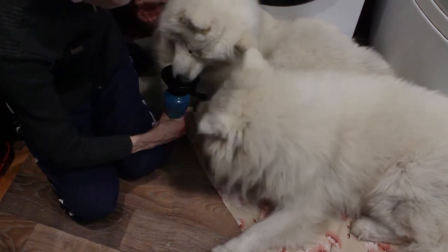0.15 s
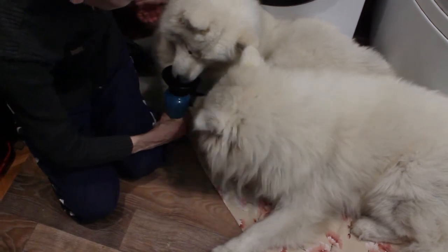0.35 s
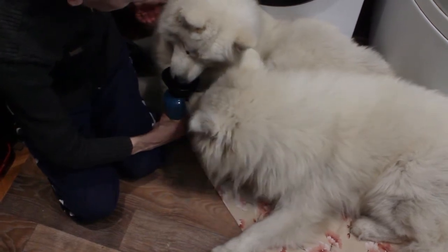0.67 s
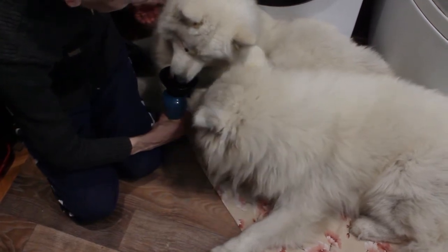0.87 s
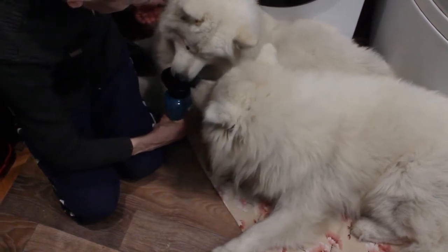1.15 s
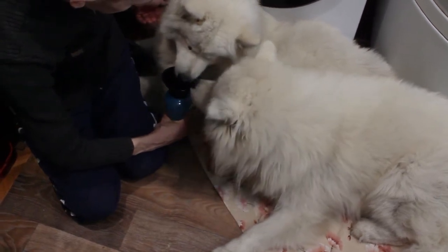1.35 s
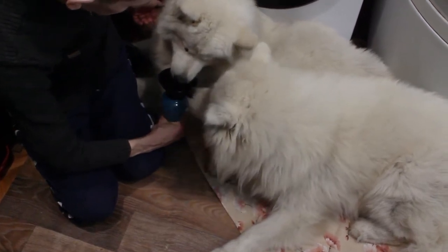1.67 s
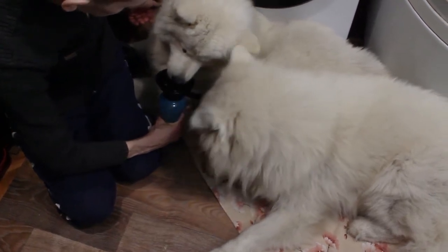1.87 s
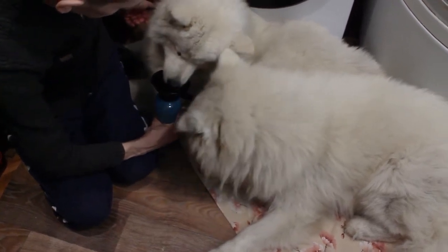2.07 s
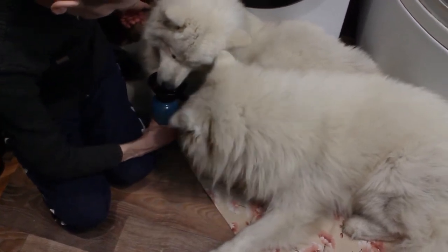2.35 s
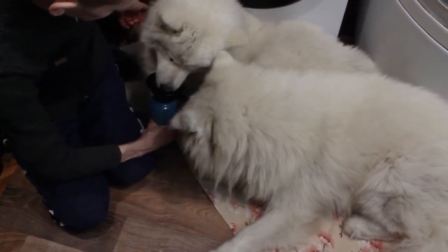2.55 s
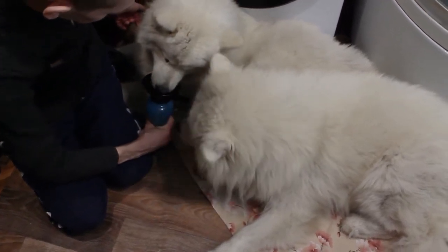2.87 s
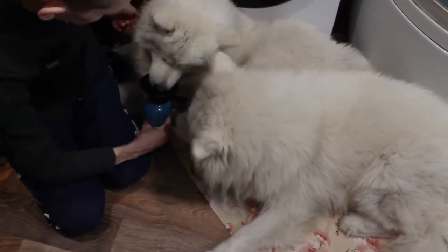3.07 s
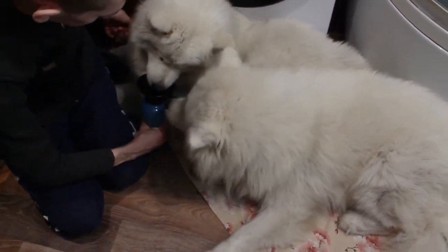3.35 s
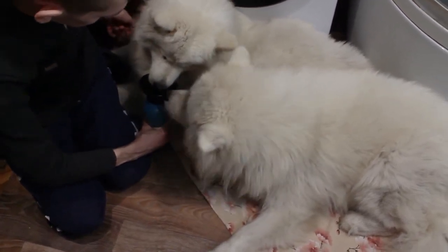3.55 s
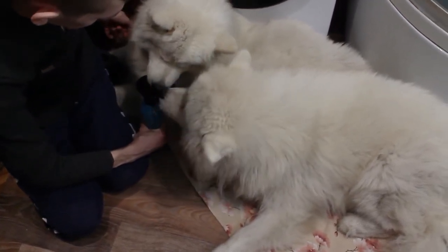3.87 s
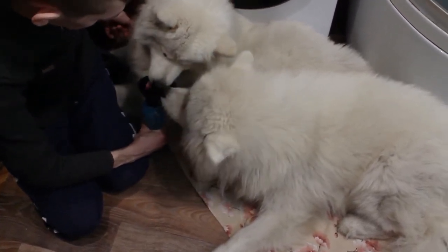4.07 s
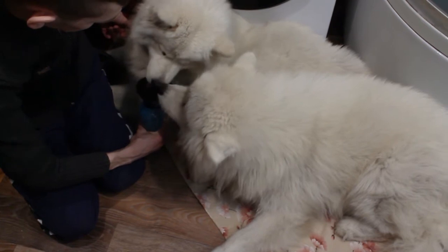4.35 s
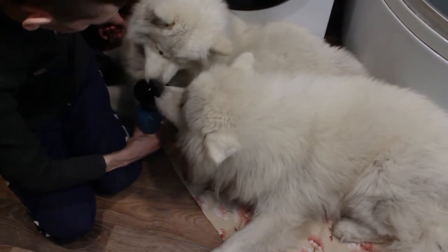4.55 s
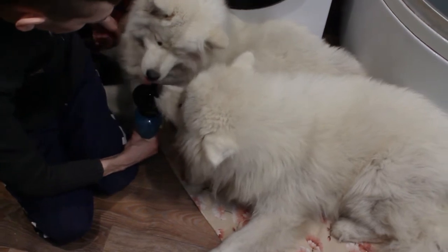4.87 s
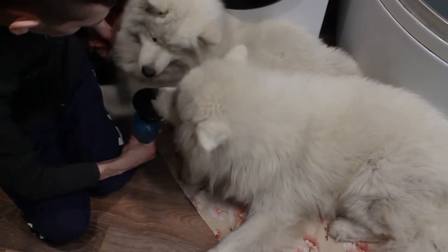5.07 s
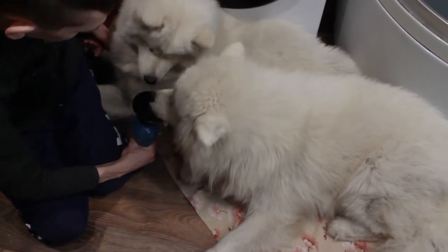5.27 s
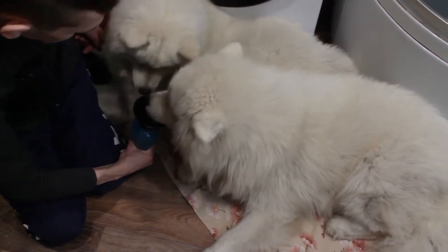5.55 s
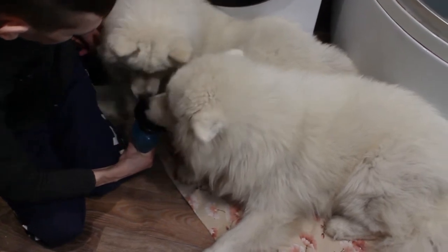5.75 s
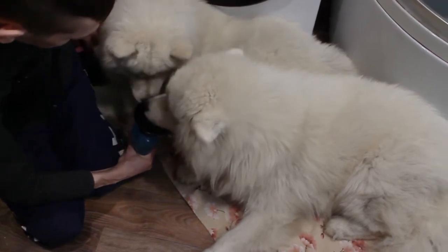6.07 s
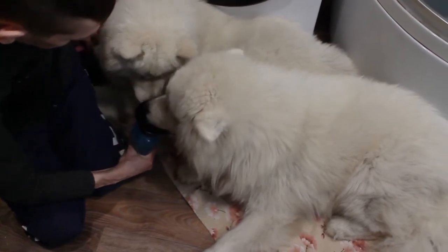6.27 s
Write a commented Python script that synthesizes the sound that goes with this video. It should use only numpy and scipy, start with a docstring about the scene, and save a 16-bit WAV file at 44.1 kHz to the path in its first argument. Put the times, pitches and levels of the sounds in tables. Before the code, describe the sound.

Two dogs lap water from a small hand-held plastic cup, wet pops, smacks and tiny clicks close up in a quiet room.

```python
"""Two dogs lapping from a cup

On the floor of a quiet room two dogs lap water from a small hand-held plastic cup, heard close up.
Each lick pops an air pocket, a ringing tone of rising pitch, while the peeling tongue smacks in a run of snaps.
Bubbles gurgle and wet films click throughout, water sloshes, a muzzle bumps the cup and teeth knock it.
Floor and walls answer as decaying noise echoes; behind lie rustling fur, a swish of coat on cloth,
and shaped noise for the low rumble, room tone and microphone hiss."""
import sys
import numpy as np
from scipy import signal
from scipy.fft import rfft, irfft, next_fast_len
from scipy.io import wavfile

SR = 44100
rng = np.random.default_rng(int(sys.argv[2]) if len(sys.argv) > 2 else 0)


def dump(signal):
    """Clip the signal to [-1, 1] and save it as 16-bit WAV at the path in sys.argv[1]."""
    limited = np.clip(np.atleast_2d(signal).T, -1, 1)
    pcm = np.round(limited * 32767).astype(np.int16)
    wavfile.write(sys.argv[1], SR, pcm)


N = 282681  # samples, about 6.4 s


def undb(db):
    """Decibels to amplitude gain."""
    return 10 ** (np.asarray(db) / 20)


def clock(length_s):
    """Sample times of a short sound, in seconds."""
    return np.arange(int(length_s * SR)) / SR


def add(track, start_s, sound, level_db):
    """Mix a short sound in; level_db is its energy spread over a hundredth of a second."""
    start = max(int(start_s * SR), 0)
    loudness = np.sqrt(np.sum(sound ** 2) / (SR / 100) + 1e-18)
    sound = sound * undb(level_db) / loudness
    track[start:start + len(sound)] += sound[:max(N - start, 0)]


def band(x, centre_hz, octaves):
    """Causal band-pass reaching the given octaves either side of its centre, within safe limits."""
    reach = 2 ** np.clip(octaves, .05, 3)
    edges_hz = np.minimum([centre_hz / reach, centre_hz * reach], [.4 * SR, .47 * SR])
    return signal.sosfilt(signal.butter(2, edges_hz, "band", fs=SR, output="sos"), x)


def grain(grain_db, hold):
    """Uneven gain that jumps at random every `hold` samples, grain_db being the standard deviation."""
    steps = rng.standard_normal(N // hold + 1)
    return undb(grain_db * np.repeat(steps, hold)[:N])


def burst(centre_hz, octaves, decay_ms):
    """A snap: a spray of random signs starts at full strength and dies quickly, inside one band."""
    t = clock(.03)
    spray = rng.choice([-1, 1], len(t)) * np.exp(-t * 1000 / decay_ms)
    return band(spray, centre_hz, octaves)


def chirp(pitch_hz, glide, ring_ms, rise_ms=0.49, rise_ms_per_octave=12):
    """One bubble: a dying tone sliding up by glide octaves per ring time; longer slides swell slower."""
    ms = clock(.06) * 1000
    # the slide passes pitch_hz at 0.95 ring times and stops at 1.45
    slide = np.minimum(ms / ring_ms, 1.45) - .95
    track_hz = pitch_hz * 2 ** (glide * slide)
    swell = 1 - np.exp(-ms / (rise_ms + rise_ms_per_octave * abs(glide)))
    return np.sin(2 * np.pi * np.cumsum(track_hz) / SR) * swell * np.exp(-ms / ring_ms)


def room(x, near_db, near_s, far_db, t60_s, damp_hz):
    """Floor, cabinets and bodies reflect from 2 ms on; a denser tail swells in; both lose treble."""
    t = clock(.4)
    sparse = rng.standard_normal(len(t)) * (rng.random(len(t)) < .2)
    near = sparse * np.exp(-t / near_s) * (t > .002)
    far = rng.standard_normal(len(t)) * np.exp(-np.log(1000) * t / t60_s) * np.minimum(t / 0.0079, 1)
    echoes = undb(near_db) * near / np.linalg.norm(near) + undb(far_db) * far / np.linalg.norm(far)
    damping = signal.butter(1, min(damp_hz, SR * .45), fs=SR, output="sos")
    return x + signal.fftconvolve(x, signal.sosfilt(damping, echoes))[:N]


def noise(spectrum):
    """Random noise whose density follows (Hz, dB per Hz) points."""
    hz, db = np.transpose(spectrum)
    size = next_fast_len(N)
    f = np.maximum(np.fft.rfftfreq(size, 1 / SR), 1)
    gain = undb(np.interp(np.log(f), np.log(hz), db)) * np.sqrt(SR / 2)
    return irfft(rfft(rng.standard_normal(size)) * gain, size)[:N]


# slow pressure rumble: freq_hz [Hz], density_db [dB per Hz]
RUMBLE = [(1, -44.5), (7, -49), (14, -58.5), (28, -63), (45, -71.5), (75, -79), (140, -91.5), (400, -125)]


def rumble():
    """Slow pressure changes reach the microphone as noise that weakens with frequency."""
    return noise(RUMBLE)


# quiet room tone and microphone hiss: freq_hz [Hz], density_db [dB per Hz]
AIR = [(100, -80), (200, -85.5), (320, -89), (520, -91.5), (730, -86.5), (1100, -96), (2100, -97.5),
       (2700, -96), (4300, -101), (7500, -101), (8200, -99.5), (9700, -101.5), (12500, -102),
       (15500, -100.5)]


def air():
    """Room tone and microphone hiss are one steady noise with a fixed colour."""
    return noise(AIR)


def coat(centre_hz=3700, octaves=0.99, grain_db=3, level_db=-65.5):
    """Long hair drags over cloth as the dogs push in: an uneven swish that rises, holds and fades."""
    start_s, end_s, rise_s, fade_s = 4.0, 6.4, 0.14, 0.69
    t = np.arange(N) / SR
    drag = np.clip(np.minimum((t - start_s) / rise_s, (end_s - t) / fade_s), 0, 1)
    catches = grain(grain_db, hold=200)
    swish = band(rng.standard_normal(N) * catches, centre_hz, octaves)
    return swish / np.std(swish) * drag * undb(level_db)


# colour of the rustle: freq_hz [Hz], relative_db [dB]
FUR = [(1500, -20), (3500, -4.5), (6000, 0), (8300, 2), (10500, 0), (14500, -20), (16000, -1.5)]
# separate brushes of fur: peak_s [s], level_db [dB]
BRUSHES = [(.22, -74), (.49, -61), (1.08, -60), (1.33, -58), (1.72, -55.5), (2.11, -56.5), (2.33, -58.5),
           (2.98, -58), (4.2, -55), (4.9, -61), (5.46, -57.5), (6.05, -60.5)]


def rustle(grain_db=3, ticks_per_s=24, tick_db=-66, tick_hz=8250, follow=0.88):
    """Fur brushes in a grainy hiss that swells and fades; tiny high ticks grow with the movement."""
    brush_s, rest_db = 0.054, -76.5  # swell and fade time constant; rustle between brushes
    t = np.arange(N) / SR
    swells = sum(undb(db) * np.exp(-np.abs(t - s) / brush_s) for s, db in BRUSHES)
    level_db = 20 * np.log10(swells + undb(rest_db))
    hiss = noise(FUR) * grain(grain_db, hold=128)
    out = hiss / np.std(hiss) * undb(level_db)
    for place, size in rng.random((int(ticks_per_s * N / SR), 2)):
        stir_db = level_db[int(place * N)] - level_db.mean()
        tick = burst(tick_hz, 0.034, decay_ms=4.3)
        add(out, place * N / SR, tick, tick_db + follow * stir_db - 6 * size)
    return out


# soft bumps of a muzzle against the held cup:
# start_s [s], pitch_hz [Hz], level_db [dB, before the offsets below]
BUMPS = [(0.701, 134, -50.5), (1.424, 140, -45), (3.382, 262, -58)]


def bumps(thud_s=0.0029, thud_db=-5, shudder_s=0.017, octaves=.55, shudder_db=-2):
    """A furry muzzle gives one dull thud, and the held cup shudders unevenly against it."""
    out, t = np.zeros(N), clock(.1)
    for s, hz, db in BUMPS:
        thud = np.sin(2 * np.pi * hz * t) * t * np.exp(-t / thud_s)
        add(out, s, thud, db + thud_db)
        shudder = rng.standard_normal(len(t)) * np.exp(-t / shudder_s)
        add(out, s, band(shudder, hz, octaves), db + shudder_db)
    return out


# teeth against the cup: start_s [s], level_db [dB, before the offsets below], centre_hz [Hz],
# spread [octaves either side], tuning [ratio on the cup's pitches], spatter_db [dB, added to level_db]
# (the crack's spread is widened by a tenth, the spatter has its own band)
KNOCKS = [(4.494, -41.5, 8550, 0.88, 1.06, -13), (4.5394, -41.5, 5400, 1.6, 0.91, -14),
          (4.785, -32, 3500, 2.1, 1.005, -10)]
# what the cup rings with: pitch_hz [Hz, before tuning], relative_db [dB], t60_s [s]
CUP = [(667, -25, .13), (786, -14, .022), (950, -20, 0.02), (1207, -23.5, 0.059), (1840, -10.5, 0.011),
       (2120, -27, .045), (2960, -9, 0.026), (4540, 0.5, 0.0048), (5000, -2, .005), (5990, -16, 0.038),
       (6950, 6.5, 0.0059), (8800, -6, 0.0079), (10360, -6.5, .007), (13830, 3.5, 0.0045)]


def knocks(crack_db=-4.5, crack_ms=0.7, splash_ms=13, ring_db=-1.5):
    """A hard contact cracks and rings the cup, which the hand damps quickly, and the water spatters."""
    rings, cracks, t = np.zeros(N), np.zeros(N), clock(.15)
    onset = 1 - np.exp(-t / 0.00033)
    for s, db, centre_hz, octaves, tuning, spatter_db in KNOCKS:
        ring = np.zeros(len(t))
        for hz, mode_db, t60_s in CUP:
            decay = np.exp(-np.log(1000) * t / t60_s)
            ring += undb(mode_db) * np.sin(2 * np.pi * hz * tuning * t) * decay
        # each spot rings with its own colour
        add(rings, s, band(ring * onset, centre_hz, octaves), db + ring_db)
        add(cracks, s - .0002, burst(centre_hz, 1.1 * octaves, crack_ms), db + crack_db)
        add(cracks, s + .00105, burst(2200, 1.8, splash_ms), db + spatter_db)
    return rings, cracks


def slosh(licks, centre_hz=780, octaves=0.64, settle_s=0.033, gain_db=-5.5, grain_db=3):
    """Water rocks in the cup with every lick: a low, soft wash follows the loudness of the mouths."""
    keep = np.exp(-1 / (max(settle_s, .01) * SR))
    stirring = signal.lfilter([1 - keep], [1, -keep], np.abs(band(licks, 1900, 0.99)))
    ripples = grain(grain_db, hold=300)
    wash = band(rng.standard_normal(N) * ripples, centre_hz, octaves)
    return wash / np.std(wash) * stirring * undb(gain_db)


# gurgles: start_s [s], length_s [s], first_pitch_hz [Hz], last_pitch_hz [Hz],
# level_db [dB, before gain_db, shared among the bubbles]
GURGLES = [(.594, .04, 1500, 2000, -57), (.657, .025, 1700, 1350, -57), (1.024, .04, 1452, 1970, -46),
           (1.037, .015, 690, 845, -51), (1.392, .06, 1690, 1440, -54), (1.505, .045, 770, 765, -54),
           (1.507, .04, 1150, 1340, -57), (1.806, .05, 2100, 1702, -54), (2.128, .05, 741, 1000, -51.5),
           (2.701, .03, 686, 915, -56), (2.975, .045, 1900, 1450, -53), (3.292, .06, 1980, 1650, -52),
           (3.373, .02, 650, 892, -55), (3.468, 0.078, 1792, 1400, -58), (4.208, .105, 1198, 1510, -53),
           (4.597, .026, 1450, 2100, -50), (4.592, .04, 4340, 4050, -52)]


def gurgles(bubbles_per_s=140, scatter_octaves=0.13, scatter_db=3, glide=0.23, ring_ms=3.4, gain_db=-3):
    """Small bubbles follow closely, their pitch drifting as the hollow under the tongue changes size."""
    out = np.zeros(N)
    for s, length, first_hz, last_hz, db in GURGLES:
        count = max(int(length * bubbles_per_s), 2)
        share_db = db + gain_db - 10 * np.log10(count)
        places = (np.arange(count) + rng.random(count)) / count
        chance = np.tanh(rng.standard_normal((count, 2)))
        for place, (pitch, size) in zip(places, chance):
            drift_hz = first_hz * (last_hz / first_hz) ** place
            bubble = chirp(drift_hz * 2 ** (scatter_octaves * pitch), glide, ring_ms)
            add(out, s + place * length, bubble, share_db + scatter_db * size)
    return out


def small_films(count=2, spread_s=.055, centre_hz=6000, scatter_octaves=0.5, octaves=0.21,
                level_db=-64, scatter_db=3.5):
    """Faint film clicks scattered around every lick, as rows like those of CLICKS."""
    films = []
    for s, *_ in LICKS:
        for when, pitch, size in rng.standard_normal((count, 3)):
            hz = centre_hz * 2 ** (scatter_octaves * np.tanh(pitch))
            films.append((s + spread_s * when, hz, octaves, level_db + scatter_db * np.tanh(size)))
    return films


# the sharpest wet films snapping on lips and tongue: start_s [s], centre_hz [Hz],
# spread [octaves, before breadth], level_db [dB, before gain_db or edge_db]
CLICKS = [(.391, 4900, .25, -59), (.71, 5500, .15, -59), (1.062, 4400, .15, -57), (1.2852, 6330, 0.6, -52),
          (1.359, 5500, .7, -58), (1.449, 3600, .15, -57), (1.65, 7000, .25, -55), (1.677, 6500, .35, -58),
          (1.6989, 7850, 0.12, -47.5), (1.7008, 2900, .15, -48), (1.7453, 3850, 0.64, -48.5),
          (1.7975, 1900, 0.33, -53.5), (1.966, 5800, .3, -57), (1.9992, 5140, 0.49, -47),
          (2.0617, 14020, .15, -51.5), (2.0935, 7000, 0.19, -51), (2.5912, 3460, 0.26, -49),
          (2.978, 5500, 0.12, -52), (3.3685, 1900, 0.23, -53.5), (3.7478, 7690, 0.53, -50),
          (3.763, 4700, 0.37, -51), (4.076, 6030, 0.22, -55), (4.1517, 4600, 0.61, -55),
          (4.1756, 7100, .6, -47.5), (4.269, 3500, 0.31, -56), (4.4995, 8400, 0.25, -45),
          (4.554, 6070, 1.2, -54), (4.603, 5200, 0.29, -51), (4.739, 3500, 0.49, -58),
          (4.7655, 3200, 0.092, -58), (4.8751, 8400, .15, -51), (5.2626, 3760, 0.73, -51.5),
          (6.161, 2880, 0.33, -58), (6.359, 5600, 0.53, -55)]


def clicks(decay_ms=0.91, breadth=1.34, gain_db=-0.5, edge_db=-8):
    """Thin films of saliva break in about a millisecond; the bright ones add a crisp edge near 13 kHz."""
    out = np.zeros(N)
    for s, hz, octaves, db in list(CLICKS) + small_films():
        add(out, s, burst(hz, breadth * octaves, decay_ms), db + gain_db)
        if hz > 6000:
            add(out, s, burst(13200, 0.36, decay_ms=0.31), db + edge_db)
    return out


# licks, each an air pocket and a smack: start_s [s], pitch_hz [Hz], pop_level_db [dB],
# smack_start_s [s], smack_centre_hz [Hz], smack_spread [octaves], smack_length_s [s], smack_level_db [dB]
# (levels and spread are before the trims in the functions that play them)
LICKS = [(0.204, 3570, -60, .21, 2800, .9, .025, -60), (0.283, 1570, -52, .279, 3500, 0.27, 0.015, -52),
         (0.375, 1780, -55, .36, 3100, 0.45, 0.033, -58), (0.653, 1594, -52.5, .652, 1290, 0.37, .026, -56),
         (1.039, 1600, -52, 1.035, 1800, .62, 0.033, -52.5),
         (1.112, 3430, -60, 1.108, 3000, 0.69, .025, -59),
         (1.386, 1420, -48, 1.381, 1687, 0.25, 0.022, -50.5),
         (1.43, 1480, -50, 1.425, 2600, .6, 0.026, -66), (1.507, 760, -48, 1.502, 1050, .33, 0.02, -52.5),
         (1.806, 1360, -50, 1.8, 2900, 0.5, 0.054, -52.5),
         (2.158, 2107, -51, 2.165, 2080, 0.7, 0.019, -53.5),
         (2.317, 1900, -63, 2.31, 2200, 0.63, 0.048, -57.5),
         (2.545, 1890, -51, 2.542, 2570, .7, 0.017, -51),
         (2.692, 660, -52.5, 2.687, 2376, 0.63, 0.044, -49.5),
         (2.981, 660, -53, 2.978, 1693, .7, 0.026, -55),
         (3.059, 1440, -50.5, 3.078, 1495, .8, 0.037, -54.5),
         (3.353, 700, -56, 3.372, 1700, 0.9, .018, -49.5), (3.462, 1746, -52, 3.47, 2800, 0.64, 0.017, -54),
         (3.52, 1308, -51, 3.51, 1400, 0.3, .04, -63), (3.926, 780, -55, 3.921, 1800, 1.1, 0.029, -52),
         (4.247, 1430, -58, 4.245, 2286, 0.61, 0.06, -54.5),
         (4.438, 1090, -59, 4.437, 3000, 0.53, 0.011, -55),
         (4.6, 1630, -49, 4.588, 4560, 0.37, 0.034, -49.5), (4.68, 1510, -53, 4.672, 4040, .42, 0.029, -71),
         (4.923, 1497, -65, 4.918, 2100, 0.71, 0.039, -54),
         (5.601, 3785, -54, 5.594, 4180, 0.13, 0.022, -50)]
# further bubbles that pop during and between licks: start_s [s], pitch_hz [Hz],
# level_db [dB, before trims], glide [octaves up per ring time], ring_ms [ms]
POPS = [(.378, 3150, -57, .04, 8.8), (.438, 1166, -52.5, 0.13, 5.5), (.587, 1485, -52, 0.026, 11),
        (.602, 1960, -51, .04, 8), (.612, 1500, -58, .03, 7), (.621, 2020, -57, .03, 5),
        (.892, 2130, -59.5, 0.18, 4), (.984, 2030, -52, 0.053, 5.6), (.994, 2350, -56, .1, 3),
        (1.279, 2058, -48.5, 0.32, 3.2), (1.297, 2030, -56, .03, 7), (1.413, 1840, -55, .2, 4),
        (1.452, 1561, -60, 0.029, 5), (1.65, 8230, -49, .02, 2.8), (1.674, 2010, -54, .04, 7),
        (1.749, 2650, -49.5, .08, 3), (1.7518, 6660, -38.5, 0.074, 2.5), (1.821, 1460, -52, 0.054, 4),
        (1.873, 1460, -54.5, .08, 3.7), (1.919, 1620, -56, .3, 7.8), (1.935, 2200, -55, .08, 6.2),
        (1.956, 2200, -58, .03, 5), (2.132, 3320, -56, .1, 4), (2.216, 2480, -52, 0.12, 5.5),
        (2.575, 1530, -52, .05, 7.7), (2.898, 1680, -46, .36, 5.2), (2.928, 2040, -57, .03, 8),
        (2.951, 1900, -49, 0.052, 6.6), (3.12, 2740, -61.5, 0.054, 5), (3.338, 1590, -54.5, 0.28, 4),
        (3.525, 1950, -53, 0.31, 3.1), (3.666, 2400, -51, 0.23, 4.5), (3.727, 2030, -50, .05, 4.5),
        (3.754, 2250, -56, .1, 1.7), (3.861, 930, -54, .1, 6), (4.059, 3070, -54.5, .1, 3.2),
        (4.277, 1605, -57, .2, 3.05), (4.31, 1420, -55.5, .04, 5), (4.532, 1147, -53, .4, 2.7),
        (4.583, 1330, -56, .05, 6), (4.63, 1530, -59, .02, 7), (4.746, 830, -58, .05, 6),
        (4.694, 3860, -61, .16, 3.8), (4.765, 1500, -54, .12, 2.6), (4.96, 4500, -59, .1, 3),
        (5.008, 5200, -60, .04, 4), (5.845, 3370, -55, 0.22, 3), (5.9105, 3700, -50, 0.21, 2.2),
        (6.355, 3090, -55, .1, 2.3)]
GLIDE_OCTAVES, POCKET_RING_MS = 0.16, 4.55  # a lick's pocket: octaves up per ring time; ring time, ms


def pockets():
    """Every lick's air pocket and every further bubble, as rows like those of POPS."""
    in_licks = [(*lick[:3], GLIDE_OCTAVES, POCKET_RING_MS) for lick in LICKS]
    return in_licks + list(POPS)


def dribble(count=6, spread_s=.04, lead_s=.002, octaves=0.42, scatter_db=4, gain_db=-20):
    """From just before every pocket's pop, the stirred water sheds a scatter of much fainter bubbles."""
    out = np.zeros(N)
    for s, hz, db, *_ in pockets():
        for when, pitch, size in rng.standard_normal((count, 3)):
            own_hz = np.clip(hz * 2 ** (octaves * pitch), 500, 12000)
            bubble = chirp(own_hz, .12, ring_ms=2.4)
            own_db = db + gain_db + scatter_db * np.tanh(size)
            add(out, s - lead_s + spread_s * abs(when), bubble, own_db)
    return out


def spatter(count=14, spread_s=.03, centre_hz=4100, octaves=0.44, scatter_db=4, gain_db=-20):
    """Each smack throws a fine spray of droplets that tick as they land."""
    out = np.zeros(N)
    for *_, s, _, _, length, db in LICKS:
        for when, pitch, size in rng.standard_normal((count, 3)):
            droplet = chirp(centre_hz * 2 ** (octaves * np.tanh(pitch)), .08, ring_ms=0.88)
            at_s = s + length / 2 + spread_s * (abs(when) - .4)
            add(out, at_s, droplet, db + gain_db + scatter_db * np.tanh(size))
    return out


def smacks(snaps_per_s=560, scatter_db=4, gain_db=0.64):
    """A peeling tongue breaks many tiny films, each with its own pitch and size."""
    out = np.zeros(N)
    for *_, s, hz, octaves, length, db in LICKS:
        count = max(int(length * snaps_per_s), 2)
        chance = rng.standard_normal((count, 2))
        times = s + length * (np.arange(count) + rng.random(count)) / count
        sizes_db = scatter_db * chance[:, 0]
        # the snaps share the smack's energy
        sizes_db = sizes_db - 10 * np.log10(np.sum(undb(sizes_db) ** 2))
        for at, size_db, shift in zip(times, sizes_db, np.tanh(chance[:, 1])):
            snap = burst(hz * 2 ** (1.38 * octaves * shift), 1.1 * octaves, decay_ms=1.0)
            add(out, at, snap, db + size_db + gain_db)
    return out


def strays(count=2, spread_s=.06, octaves=0.41, below_db=-13):
    """Each lick has fainter bubbles that burst a little before or after it, as rows like those of POPS."""
    usual_hz = np.median([hz for _, hz, *_ in pockets()])
    bubbles = []
    for s, _, db, *_ in LICKS:
        for when, pitch in rng.standard_normal((count, 2)):
            hz = usual_hz * 2 ** (octaves * np.tanh(pitch))
            bubbles.append((s + spread_s * when, hz, db + below_db, GLIDE_OCTAVES, POCKET_RING_MS))
    return bubbles


def pops(spray_db=-10, gain_db=-3.0):
    """A small cavity rings as it opens, sliding up in pitch, with a little wet spray."""
    out = np.zeros(N)
    for s, hz, db, glide, ring_ms in pockets() + strays():
        add(out, s, chirp(hz, glide, ring_ms), db + gain_db)
        add(out, s, burst(hz, 0.42, decay_ms=2.4), db + gain_db + spray_db)
    return out


def scene():
    """Mouths arrive with clear room echoes, clicks with the strongest; the cup's ring is more direct."""
    background = rumble() + air() + coat() + rustle()
    rings, cracks = knocks()
    cup = room(rings, near_db=-7.5, near_s=0.011, far_db=-14, t60_s=0.23, damp_hz=10000)
    cup = cup + room(cracks, near_db=-5.5, near_s=0.011, far_db=-6.5, t60_s=0.3, damp_hz=7500)
    films = room(clicks(), near_db=-1.5, near_s=0.012, far_db=-3, t60_s=0.23, damp_hz=11200)
    licks = gurgles() + dribble() + spatter() + smacks() + pops()
    mouths = licks + slosh(licks) + bumps()
    mouths = room(mouths, near_db=-5, near_s=0.012, far_db=-7.0, t60_s=0.21, damp_hz=10600)
    return (background + cup + films + mouths)[None]


def record(dry, top_hz=15900):
    """The recorder cuts the treble steeply above top_hz."""
    return signal.sosfilt(signal.ellip(10, .1, 70, top_hz, fs=SR, output="sos"), dry)


dry = scene()
out = record(dry)
dump(out)
```